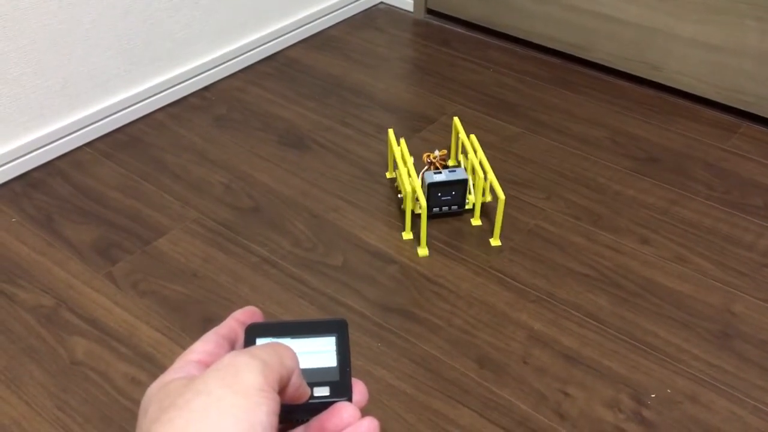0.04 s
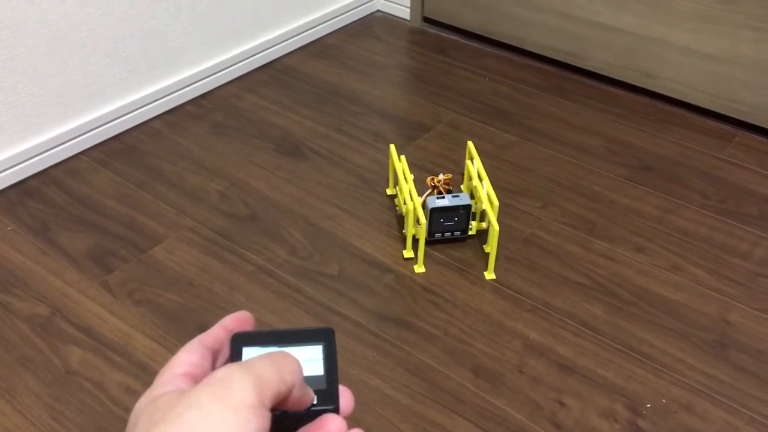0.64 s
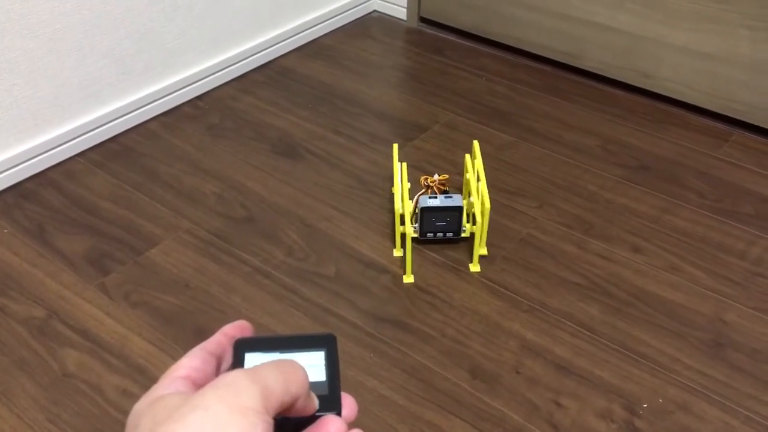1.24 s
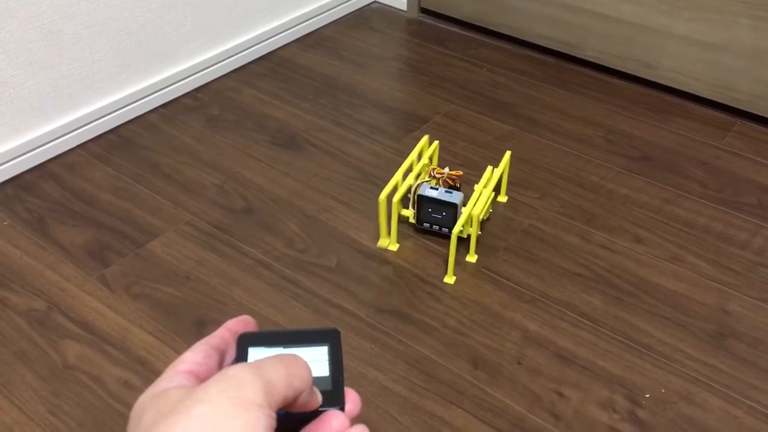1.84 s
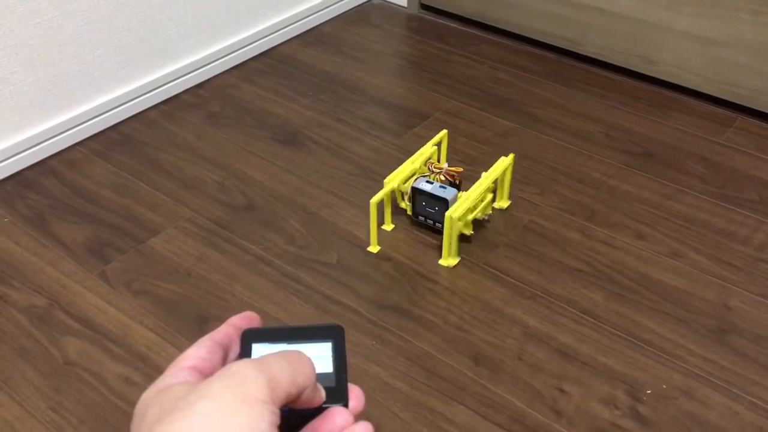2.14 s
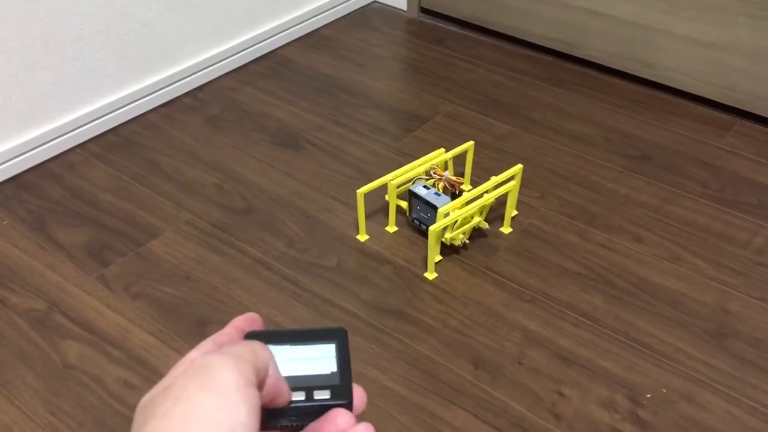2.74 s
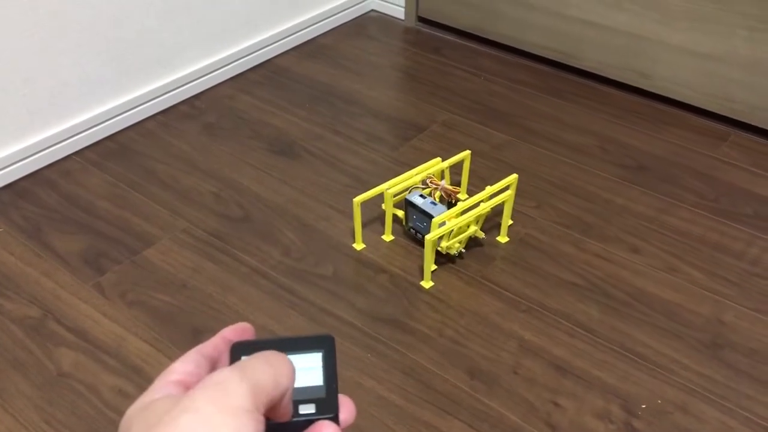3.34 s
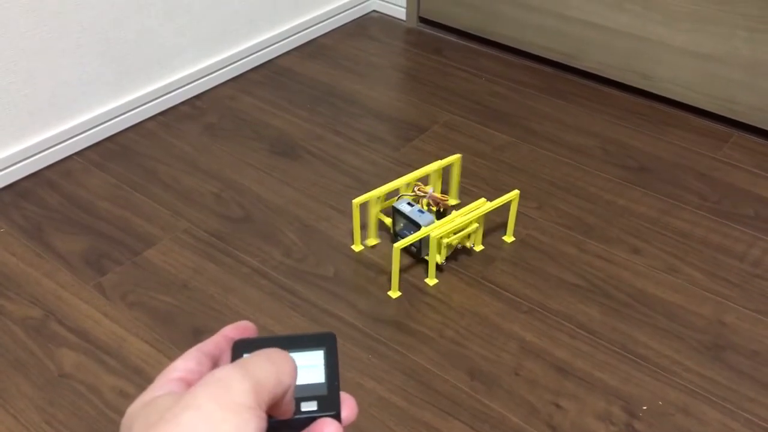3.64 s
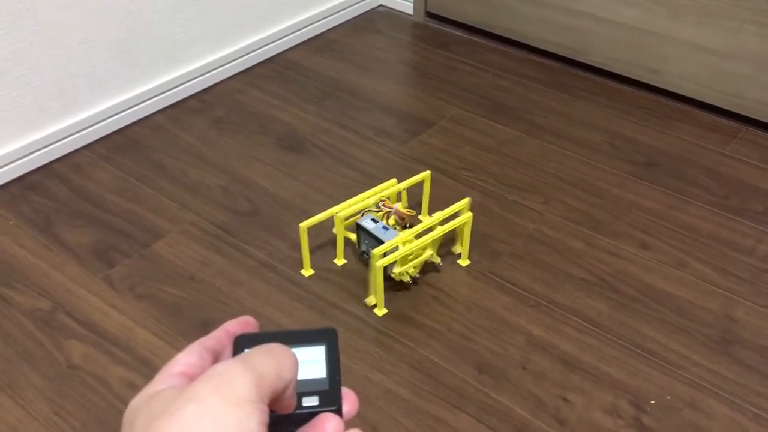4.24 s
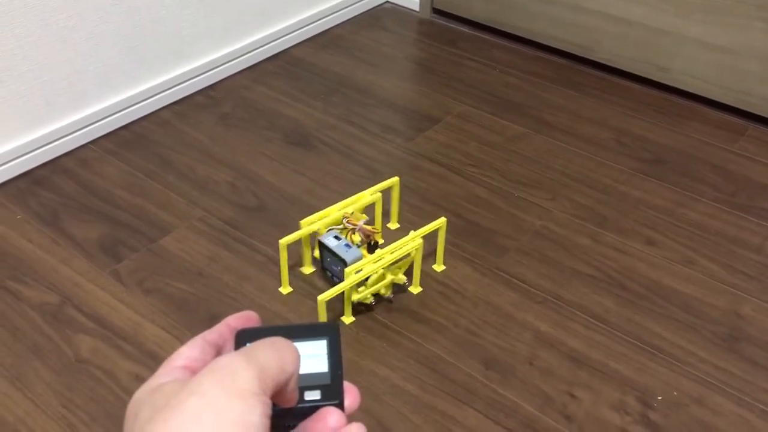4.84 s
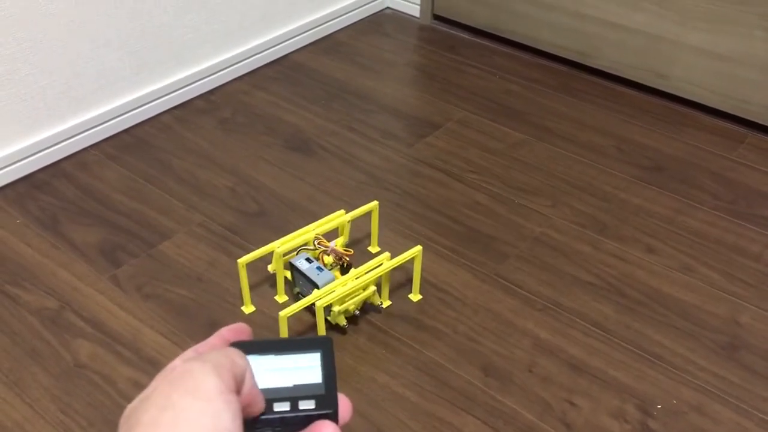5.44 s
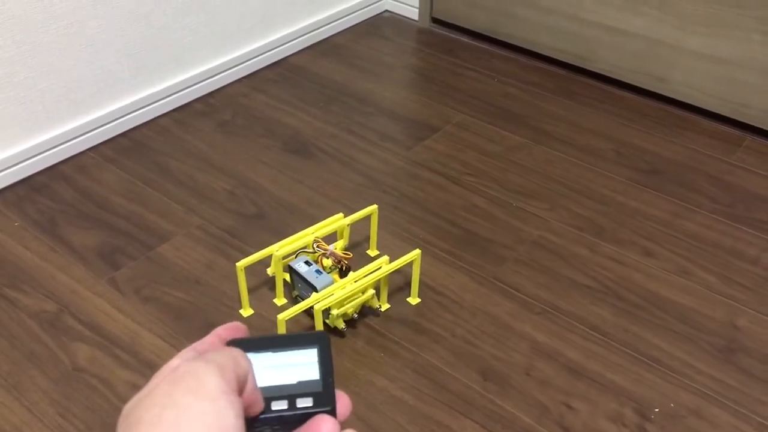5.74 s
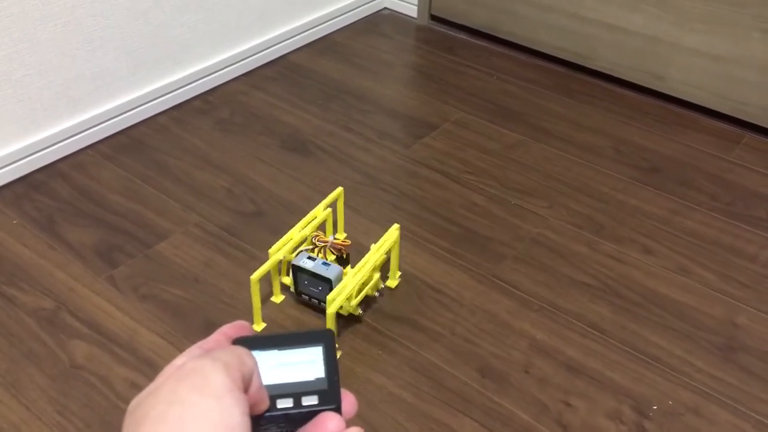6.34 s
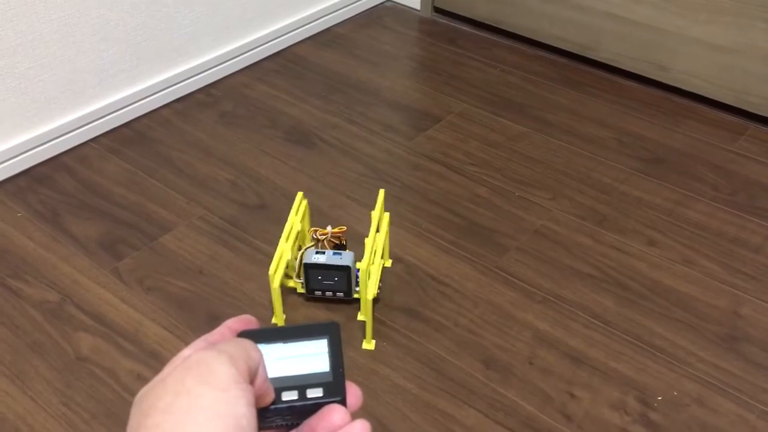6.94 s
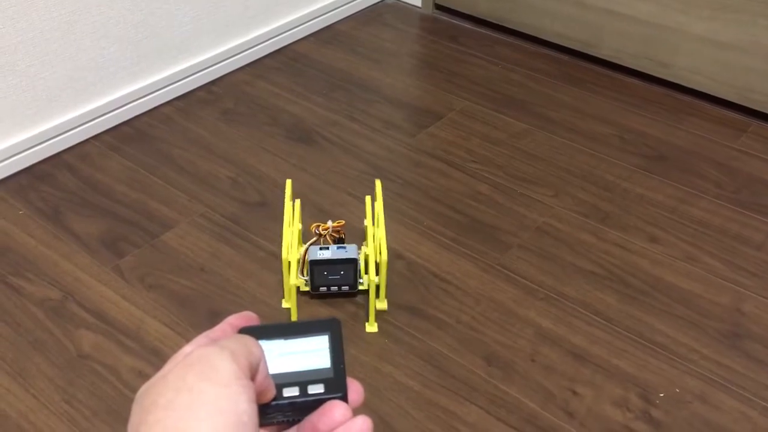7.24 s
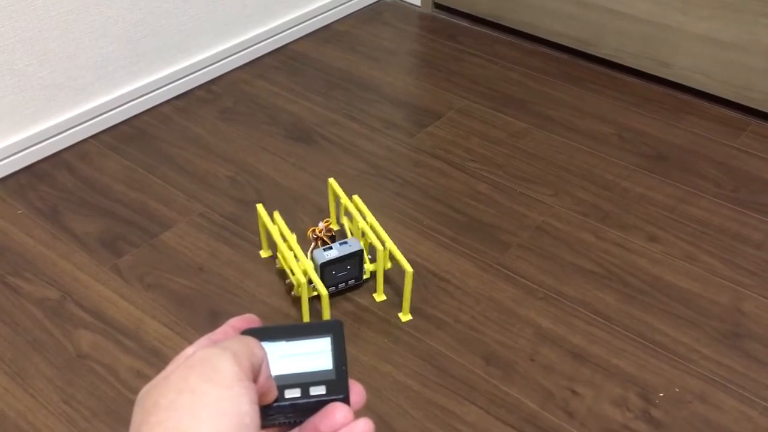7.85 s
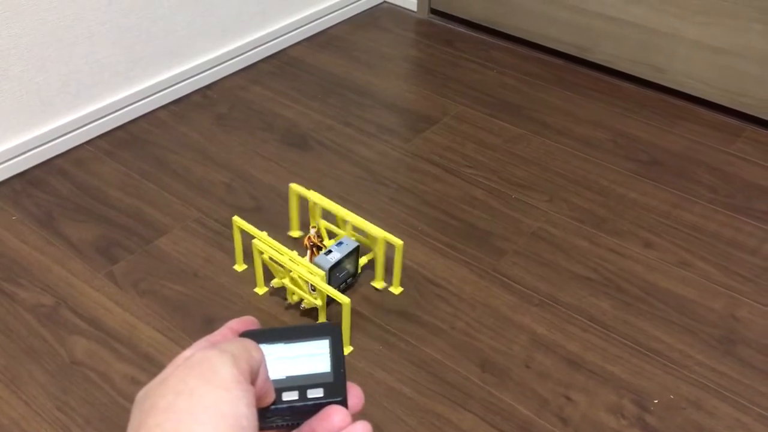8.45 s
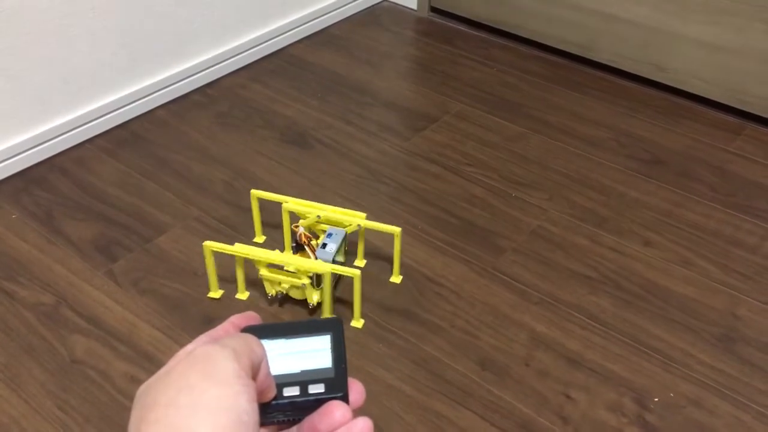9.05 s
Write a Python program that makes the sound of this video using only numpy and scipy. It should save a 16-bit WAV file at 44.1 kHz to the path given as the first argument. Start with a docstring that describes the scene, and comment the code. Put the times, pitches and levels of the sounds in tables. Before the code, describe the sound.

High, raspy motor whirring starts at once and cuts off after a button click, leaving a faint servo buzz. Three longer runs follow, separated by short pauses: small gears clatter and squeal in a wavering rhythm as a little robot steps along, its plastic feet knocking lightly and sometimes dragging on wood. Another click comes just before the final pause. The microphone is fairly close, in a small, faintly humming room.

```python
"""A small eight-legged robot is already walking over a wooden floor in a humming room. Its two geared
servos whine and rattle, sagging under each stride, while plastic feet knock the boards into vibration.
The buttons of a hand-held remote click, the robot halts, and the idle servos buzz faintly. Two longer
bursts of walking follow, with a foot dragging now and then. After a last buzzing pause the robot
walks on to the end."""
import sys
import numpy as np
from scipy import signal
from scipy.fft import rfft, irfft, next_fast_len
from scipy.io import wavfile

SR = 44100
rng = np.random.default_rng(int(sys.argv[2]) if len(sys.argv) > 2 else 0)


def wav_out(sig):
    """Save sig, one row per channel (or a flat mono array), as 16-bit PCM at SR to the path in sys.argv[1]."""
    wavfile.write(sys.argv[1], SR, np.round(np.clip(np.atleast_2d(sig).T, -1, 1) * 32767).astype(np.int16))


N = 405719
T = np.arange(N) / SR


def amp(db):
    """Amplitude ratio of a level."""
    return 10 ** (np.asarray(db) / 20)


def unit(x):
    """Normalisation to rms 1."""
    return x / np.sqrt(np.mean(x ** 2) + 1e-20)


def at_frequency(points, hz):
    """Interpolation on a log-frequency axis."""
    f, value = np.transpose(points)
    return np.interp(np.log(hz + 1), np.log(f + 1), value)


def curve(rows):
    """Linear interpolation of (t/s, value) at every sample."""
    return np.interp(T, *np.transpose(rows))


def colour(x, points):
    """Spectral shaping by (f/Hz, gain/dB), to rms 1."""
    size = next_fast_len(N, True)
    gain = amp(at_frequency(points, np.fft.rfftfreq(size, 1 / SR)))
    return unit(irfft(rfft(x, size) * gain, size)[:N])


def wander(hz):
    """Random fluctuation: noise low-passed at hz, rms 1."""
    size = next_fast_len(N, True)
    f = np.fft.rfftfreq(size, 1 / SR)
    return unit(irfft(rfft(rng.standard_normal(size)) / (1 + (f / hz) ** 4), size)[:N])


def add(mix, s, sound):
    """Superposition of a sound from time s on."""
    part = mix[max(round(s * SR), 0):][:len(sound)]
    part += sound[:len(part)]


def gate(start, stop, rise, decay_db_per_s=314):
    """Envelope: power-law attack, hold, exponential decay."""
    return np.clip((T - start) / rise, 0, 1) ** 1.15 * amp(-decay_db_per_s * np.maximum(T - stop, 0))


def swells(rows):
    """Sum of raised-cosine pulses (centre t/s, length/s, height)."""
    out = np.zeros(N)
    for s, length, height in rows:
        span = slice(*np.searchsorted(T, [s - length / 2, s + length / 2]))
        out[span] += height * np.cos(np.pi * (T[span] - s) / length) ** 2
    return out


# spectrum of the room air: f/Hz, gain/dB
AIR_SPECTRUM = [(15, -40), (25, -22), (70, -9.5), (95, -9.5), (126, -15.5), (165, -15), (234, -21.5),
                (470, -29.5), (1500, -37.5), (2860, -37), (4280, -38), (12600, -35.5), (15600, -47)]
# low hum and high electrical tones: f/Hz, level/dB
HUM_TONES = [(50, -74.5), (87, -65), (205, -78), (4300, -85.5), (10950, -80), (12830, -89)]


def background():
    """Ambient noise: broadband air under tones that waver in amplitude and phase."""
    hum = sum(amp(db + 2 * wander(0.99)) * unit(np.sin(2 * np.pi * hz * T + 1.14 * wander(3.4)))
              for hz, db in HUM_TONES)
    return hum + amp(-63) * colour(rng.standard_normal(N), AIR_SPECTRUM)


# reverberation time: f/Hz, T60/s
REVERB_TIMES = [(200, 0.27), (1000, 0.24), (4000, 0.21), (15000, 0.025)]


def room(x, wet_db=-9):
    """Reverberation: sparse reflections from floor and walls decay faster at high frequencies."""
    size = SR // 2
    echoes = rng.choice([-1., 1.], size) * (rng.random(size) < 2500 / SR)
    echoes *= np.arange(size) > .003 * SR
    hz, t, spectra = signal.stft(echoes, SR, nperseg=256)
    decay = amp(-60 * t / at_frequency(REVERB_TIMES, hz)[:, None])
    tail = signal.istft(spectra * decay, SR, nperseg=256)[1]
    return x + amp(wet_db) * signal.fftconvolve(x, tail / np.linalg.norm(tail))[:N]


# spectrum of a sliding foot: f/Hz, gain/dB
SCRAPE_SPECTRUM = [(150, -42), (300, -4), (460, -4), (620, 6.5), (900, -11), (1400, -22), (2500, -26)]
# foot drags: centre t/s, length/s, level/dB
FOOT_DRAGS = [(1.247, 0.4, -56.5), (2.3, 0.46, -46), (4.834, 0.13, -49)]


def drags():
    """Stick-slip friction: a sliding foot catches on the grain of the wood."""
    slips = colour(impacts(per_s=1500, spread_db=0.5), SCRAPE_SPECTRUM)
    return slips * swells((s, length, amp(db)) for s, length, db in FOOT_DRAGS)


# chatter rate at rest: t/s, f/Hz
CHATTER_RATE = [(.5, 560), (.7, 512), (.95, 437), (5.3, 347), (5.42, 321), (5.58, 252), (5.8, 240)]
# spectrum of the idle buzz: f/Hz, gain/dB
BUZZ_SPECTRUM = [(1650, -48), (2800, -29), (2940, -38), (3040, -16), (3380, 2), (3670, -3), (4170, -1.5),
                 (4660, -19), (5000, -50), (6500, -53.5), (11000, -120)]
# spectrum of the idle rasp: f/Hz, gain/dB
RASP_SPECTRUM = [(2820, -16), (4800, -6), (5730, -1), (7900, -5), (8760, 0.5), (10500, -8), (11700, -1),
                 (12600, -13), (15600, -14)]
# twitches of an idle servo: centre t/s, length/s, level/dB
IDLE_TWITCHES = [(0.558, 0.09, -54.5), (0.708, 0.062, -58), (0.903, 0.12, -62), (5.413, 0.14, -54),
                 (5.571, 0.14, -59.5)]
# spells of buzzing: start t/s, stop t/s, level/dB
IDLE_SPELLS = [(0.447, 0.952, -62.5), (2.54, 2.606, -59), (5.24, 5.622, -67)]


def idle():
    """Pulse-modulated noise: stopped servos chatter, ring their cases and rasp at each twitch."""
    cycle = np.cumsum(curve(CHATTER_RATE) * (1 + 0.0039 * wander(50))) / SR % 1
    chatter = (0.97 + 2 * np.exp(-cycle / 0.13)) * rng.standard_normal(N)
    twitch = swells((s, length, amp(db)) for s, length, db in IDLE_TWITCHES)
    buzz = sum(amp(db) * gate(start, stop, rise=0.037) for start, stop, db in IDLE_SPELLS)
    rasp = twitch + amp(-0.5) * buzz
    return colour(chatter, BUZZ_SPECTRUM) * buzz + colour(chatter, RASP_SPECTRUM) * rasp


def strike(modes, tilt_db, vary_db, scuff, scuff_s):
    """Free vibration: a blow excites damped modes, tilted by tilt_db per octave, and contact noise."""
    t = np.arange(SR // 5) / SR
    ring = np.zeros(len(t))
    for hz, db, t60 in modes:
        force, detune, phase = rng.standard_normal(3)
        envelope = amp(db + vary_db * force + tilt_db * np.log2(hz / 700) - 60 * t / t60)
        ring += envelope * np.sin(2 * np.pi * (hz * (1 + 0.019 * detune) * t + phase))
    ring *= 1 - np.exp(-t / 0.00046)
    band = signal.butter(2, [400, 2200], "band", fs=SR)
    contact = unit(signal.lfilter(*band, rng.standard_normal(len(t))))
    sound = ring / abs(ring).max() + scuff * contact * np.exp(-t / scuff_s)
    return sound / abs(sound).max()


# modes of a button: f/Hz, level/dB, T60/s
BUTTON_MODES = [(1130, -12, .012), (1420, -10, 0.012), (1800, -1, 0.026), (1870, 0, 0.022),
                (2140, -5, 0.017), (2880, -15, 0.0081)]
# button presses: t/s, relative level/dB
BUTTON_PRESSES = [(0.282, -34), (0.3595, -48), (0.9346, -56.5), (3.2191, -53), (5.063, -34)]


def clicks():
    """Impulse response: the remote's buttons ring briefly under the thumb."""
    out = np.zeros(N)
    for s, db in BUTTON_PRESSES:
        click = strike(BUTTON_MODES, tilt_db=8, vary_db=0, scuff=0.21, scuff_s=0.0031)
        add(out, s, amp(db + 6.5) * click)
    return out


# modes of a leg on the boards: f/Hz, level/dB, T60/s
LEG_MODES = [(327.4, -11.5, 0.14), (422, -11, 0.074), (494, -1, 0.045), (543, 0.5, 0.047),
             (618.2, -2.5, 0.089), (693, 1, 0.051), (781.4, -5.5, 0.035), (904, -1.5, 0.03),
             (1004, -6, 0.023), (1220, -16, 0.041), (1436, -15, 0.016), (1660, -16.5, 0.021),
             (1890, -21, 0.053)]
# footfalls: t/s, relative level/dB, hardness/dB
FOOTFALLS = [(.116, -39.5, -25), (.354, -43.5, -25), (1.406, -38, -13), (1.468, -45.5, -22),
             (1.585, -46, -5), (1.599, -34, -10), (1.824, -42.5, -10), (1.99, -44, -13), (2.232, -44, -8),
             (2.291, -42, -28), (2.411, -33, -2.5), (3.529, -44.5, -25), (3.558, -47, -31),
             (3.826, -40, -24), (3.955, -41, -35), (4.023, -43.5, -8), (4.194, -35.5, -15),
             (4.259, -43, -14), (4.372, -41, -10), (4.633, -44.5, -14), (4.794, -44, -50),
             (4.836, -43, -33), (5.017, -38, -8), (5.081, -45.5, -16), (6.093, -46, -19),
             (6.118, -45.5, -20), (6.174, -44, -20), (6.514, -42.5, -15), (6.647, -37.5, -12),
             (6.937, -40.5, -11), (7.034, -45, -13), (7.349, -45.5, -8), (7.52, -44, 2),
             (7.543, -40.5, -14), (7.729, -45.5, -11), (7.914, -45.5, -16), (8.074, -45.5, -10),
             (8.427, -39.5, -12), (8.556, -46.5, -19), (8.8, -45, -22), (8.984, -42, -9)]


def footsteps(taps_per_s=5):
    """Impact excitation: harder landings favour higher modes; other feet tap lightly at random."""
    out = np.zeros(N)
    walking = (T > walk("start") + SPIN_UP_S) & (T < walk("stop"))
    tap_times = T[walking & (rng.random(N) < taps_per_s / SR)]
    for s, db, hardness in FOOTFALLS:
        knock = strike(LEG_MODES, tilt_db=0.71 * (hardness + 18), vary_db=6.5, scuff=0.24, scuff_s=0.0048)
        add(out, s, amp(db + 8) * knock)
    for s in tap_times:
        gain = amp(-46 + 1.5 * rng.standard_normal())
        add(out, s, gain * strike(LEG_MODES, tilt_db=1.5, vary_db=3, scuff=0.39, scuff_s=0.012))
    return out


# bursts of walking: start t/s, stop t/s, rise/s, unloaded tooth f/Hz, share of speed lost in braking,
# chopping depth, rattle level/dB, then relative level/dB of top treble, boards, whine and squeal
BURSTS = [(-.2, 0.419, .06, 2904, 0.39, 0.35, -33, -5, -27, -6, -16.5),
          (1.016, 2.523, 0.075, 2965, 0.38, 0.25, -32.5, -0.5, -25.5, -12, -16.5),
          (3.325, 5.196, 0.088, 3137, .03, 0.44, -33, -0.5, -29.5, -6.5, -14.5),
          (5.77, 9.299, 0.14, 2945, 0, 0.21, -32.5, -3.5, -23, -2.5, -15.5)]
# names of those columns
BURST_COLUMNS = ("start", "stop", "rise", "hz", "braking", "chop", "rattle", "treble", "boards", "whine",
                 "squeal")
SPIN_UP_S, BRAKE_S = .172, .12


def walk(name):
    """Step function: one setting of a burst, held until the next starts."""
    columns = np.transpose(BURSTS)
    return columns[BURST_COLUMNS.index(name)][np.searchsorted(columns[0], T, "right") - 1]


def spin():
    """Uniform acceleration: the share of full speed ramps up at a start and down in braking."""
    up = np.clip((T - walk("start")) / SPIN_UP_S, 0, 1)
    down = np.clip((T - walk("stop")) / BRAKE_S + 1, 0, 1)
    return up * (1 - walk("braking") * down)


def drive(control_hz=60, kick_s=0.0026, surge=0.15):
    """Amplitude modulation: each control pulse jolts the gears with a surge of torque."""
    age = (T * control_hz) % 1 / control_hz
    jolt = 0.92 * np.exp(-age / kick_s) + surge * np.cos(2 * np.pi * control_hz * age)
    return unit(1 + walk("chop") * jolt)


# strides: peak t/s of servo A's load, share of speed A loses, B's lag/s, share B loses, B's squeal gain/dB
STRIDE_LOADS = [(0, .13, 0.17, 0.094, 2.5), (1.2, .07, 0.082, 0.12, 4.5), (1.62, 0.042, 0.068, 0.084, 5.5),
                (2.16, 0.034, -.01, 0.12, 5), (3.361, .15, 0.1, 0.14, -8), (3.75, 0.17, 0.086, 0.16, 1),
                (4.09, .14, 0.018, 0.093, -3), (4.53, 0.21, 0.11, .17, -2), (4.94, 0.092, 0.0072, .11, -3),
                (6.04, .155, .14, 0.036, 2), (6.47, 0.17, -0.0092, .13, 1.5), (6.94, .18, -.04, .15, -2.5),
                (7.37, 0.17, -.04, .13, 1), (7.81, 0.16, .04, .07, 3.5), (8.26, 0.15, 0.026, 0.1, -1.5),
                (8.68, .17, 0.034, .06, 0.5), (9.14, 0.17, -0.029, .1, -4)]


def strides(length_s=.46):
    """Mechanical loading: each stride slows both servos and changes the level of B's squeal."""
    load_a = swells((s, length_s, sag) for s, sag, _, _, _ in STRIDE_LOADS)
    load_b = swells((s + lag, length_s, sag) for s, _, lag, sag, _ in STRIDE_LOADS)
    squeal_db = swells((s + lag, length_s, db) for s, _, lag, _, db in STRIDE_LOADS)
    return load_a, load_b, squeal_db


# grinding gears: centre t/s, length/s, share of speed lost, whirr gain/dB, top treble gain/dB
GEAR_GRINDS = [(1.441, .09, .12, 8, 2), (1.863, .15, .17, 6, 4), (2.253, .13, .09, 8, 2),
               (3.85, .17, .02, 5, 6.5), (4.206, .06, .01, 4, 6), (4.66, .2, .01, -8, 7.5),
               (6.372, .09, .07, 1, 6), (7.191, .11, .1, 1, 0), (7.58, 0.13, .035, 7, -2),
               (7.82, .12, 0.018, 3, 2), (8.021, .13, .11, -1, 5), (8.386, 0.097, 0.01014, 3, 3),
               (8.85, .16, .07, 5.5, 2)]


def grinds():
    """Friction: as a leg takes the weight, the gears slow and their whirr and treble change."""
    s, length, *effects = np.transpose(GEAR_GRINDS)
    return [swells(zip(s, length, heights)) for heights in effects]


# modes of the plastic frame: f/Hz, bandwidth/Hz, gain/dB
FRAME_MODES = [(2425, 22, 5.5), (2500, 15, -9), (2476, 22, 4.5), (2770, 13, -25), (2926, 8.3, 11.5),
               (3174, 52, 8), (3260, 50, -16), (3377, 13, 11), (3930, 21, -8), (5500, 39, -31),
               (8500, 75, 2), (9944, 62, 6.5)]


def frame(x):
    """Resonance: the frame responds in narrow bands around its natural frequencies."""
    return unit(sum(amp(db) * signal.lfilter(*signal.iirpeak(hz, hz / width, SR), x)
                    for hz, width, db in FRAME_MODES))


def impacts(per_s, spread_db):
    """Poisson process: tiny independent collisions of uneven force."""
    force = amp(spread_db * np.clip(rng.standard_normal(N), -2, 2))
    return unit(force * rng.choice([-1, 1], N) * (rng.random(N) < per_s / SR))


# response of the gear case: f/Hz, gain/dB
CASE_RESPONSE = [(2000, -33.5), (3400, -3.5), (3670, -7), (3990, -3), (4740, -7), (5310, -2), (6680, -3.5),
                 (7940, -0.5), (9730, 2.5), (10600, -2.5), (11700, -2), (12750, -1), (13700, -5.5),
                 (15600, -6.5)]
# response of the housing: f/Hz, gain/dB
HOUSING_RESPONSE = [(1300, -20), (1700, -16), (1900, -1), (2450, 0.5), (3380, -6.5), (3650, -55),
                    (4200, -38)]
# response of the floorboards: f/Hz, gain/dB
BOARD_RESPONSE = [(130, -42), (220, -8.5), (292, -4.5), (333, 4), (400, -6), (480, -1), (615, 2.5),
                  (950, -3.5), (1300, -14), (1650, -6), (2500, -22)]


def rattle(torque, gear_gain, housing_gain):
    """Structure-borne sound: loose teeth clatter, and case, housing, frame and boards ring."""
    clatter = impacts(per_s=11000, spread_db=3.5) * torque * amp(0.86 * wander(67))
    case = colour(clatter, CASE_RESPONSE)
    treble = signal.sosfiltfilt(signal.butter(4, 11300, "high", fs=SR, output="sos"), case)
    _, _, treble_db = grinds()
    rasp = amp(0.48) * unit(unit(case - treble) + unit(treble) * amp(walk("treble") + treble_db))
    jolts = impacts(per_s=1200, spread_db=6.5) * torque
    boards = colour(jolts, BOARD_RESPONSE) * amp(walk("boards") + 0.06)
    ring = amp(-8) * colour(clatter, HOUSING_RESPONSE) + amp(-8.5) * frame(clatter)
    return (rasp + boards) * gear_gain + ring * housing_gain


# coupling of the tooth rate into the housing: f/Hz, gain/dB
MESH_COUPLING = [(1400, -30), (2100, 2), (2450, 4), (2620, 4.5), (2900, 1.5), (3150, 4)]


def mesh(hz, harmonics_db, jitter, runout, flutter_db=3.5, teeth=9):
    """Phase modulation: an off-centre pinion adds sidebands to the harmonics of meshing teeth."""
    phase = 2 * np.pi * np.cumsum(hz * (1 + jitter * wander(249.7) + .008 * wander(25.01))) / SR
    phase += runout * np.sin(phase / teeth)
    tone = sum(amp(db + flutter_db * wander(104)) * np.sin(k * phase)
               for k, db in enumerate(harmonics_db, 1))
    return unit(tone) * amp(at_frequency(MESH_COUPLING, hz))


def whine(torque, gear_gain, housing_gain):
    """Forced vibration: tooth tones swell in each resonance they cross; B squeals on its overtones."""
    load_a, load_b, squeal_db = strides()
    grind_sag, whirr_db, _ = grinds()
    tooth_hz = walk("hz") * spin() * (1 - grind_sag)
    hz_a, hz_b = tooth_hz * (1 - load_a), tooth_hz * (1 - load_b)
    servo_a = mesh(hz_a, [0, -14, -10, -13], jitter=.014, runout=.6)
    servo_b = mesh(hz_b, [0], jitter=.007, runout=.4)
    rotor = mesh(4 / 3 * hz_a, [0], jitter=.014, runout=.3)
    squeal = mesh(hz_b, [-14, 0, -7, -9, -13], jitter=.005, runout=.3)
    # slack teeth smear the high overtones into rough bands
    whirr = mesh(hz_b, [-40, -20, 0, 0, -4], jitter=.011, runout=.35, flutter_db=4)
    tones = torque * (servo_a + amp(-8) * servo_b + amp(-9.5) * rotor)
    low = (tones + amp(-6.5) * frame(tones)) * amp(walk("whine"))
    high = torque * (squeal * amp(walk("squeal") + squeal_db) + whirr * amp(whirr_db - 12.5))
    return low * housing_gain + high * gear_gain


# the gears run light as a leg swings free: centre t/s, length/s, gain/dB
LEG_SWINGS = [(1.53, 0.2, -1.5), (1.94, 0.15, -0.5), (2.31, 0.089, -2), (3.94, 0.13, -3), (4.77, .12, -2),
              (5.2, 0.17, -2), (6.61, 0.25, -2), (7.48, .08, -1.5), (8.09, .12, -1.5), (8.26, 0.16, -2.5),
              (8.97, 0.18, -2.2)]
# ring of the unloaded housing: t/s, level/dB
HOUSING_LEVEL = [(0, -42.5), (.4, -47), (1.15, -52.5), (1.9, -46.5), (2.25, -52), (2.45, -47.5), (4.1, -47),
                 (4.9, -43.5), (5.95, -42), (6.25, -45.5), (9.2, -44)]


def servos(gear_load_db=2.5, housing_load_db=10.5):
    """Load-dependent radiation: the two servos grow louder as each stride slows them."""
    load_a, load_b, _ = strides()
    running = gate(walk("start"), walk("stop"), walk("rise"))
    gear_gain = running * amp(walk("rattle") + gear_load_db * load_b + swells(LEG_SWINGS))
    housing_gain = running * spin() ** .4 * amp(curve(HOUSING_LEVEL) + housing_load_db * load_a)
    torque = drive()
    return rattle(torque, gear_gain, housing_gain) + whine(torque, gear_gain, housing_gain)


def scene():
    """Superposition of robot, remote and room at one point, alike in both channels."""
    direct = servos() + idle() + footsteps() + clicks() + drags()
    mono = amp(-1.5) * room(direct) + background()
    return np.array([mono, mono])


def record(dry):
    """Band limiting: a linear-phase low-pass at 15.9 kHz."""
    lowpass = signal.firwin(511, 15900, window=("kaiser", 9), fs=SR)
    return signal.oaconvolve(dry, lowpass[None], "same")


dry = scene()
out = record(dry)
wav_out(out)
```